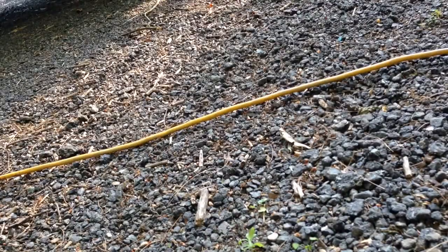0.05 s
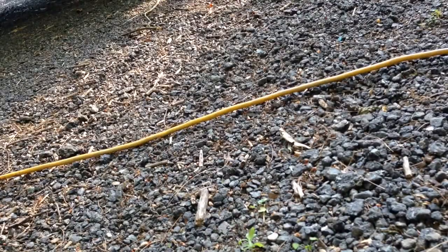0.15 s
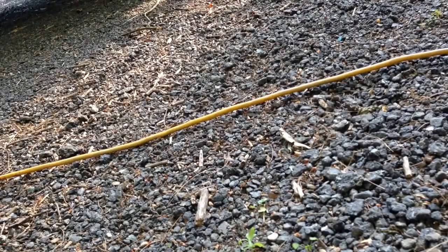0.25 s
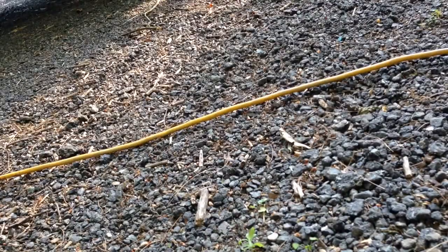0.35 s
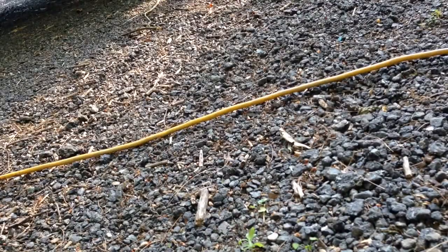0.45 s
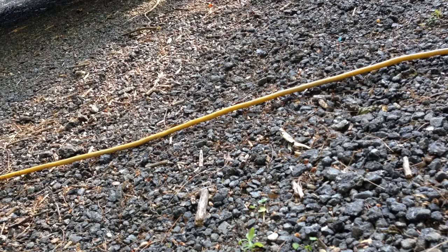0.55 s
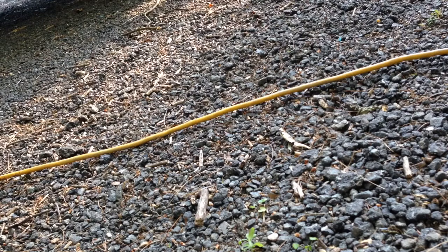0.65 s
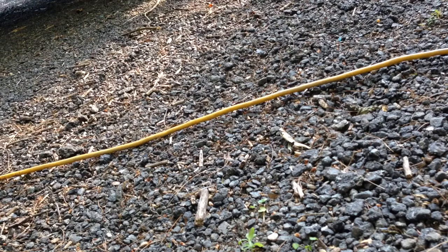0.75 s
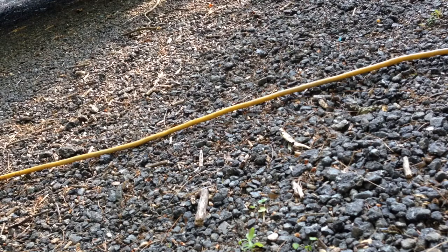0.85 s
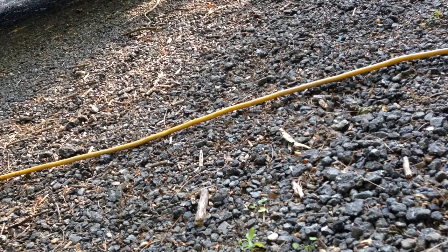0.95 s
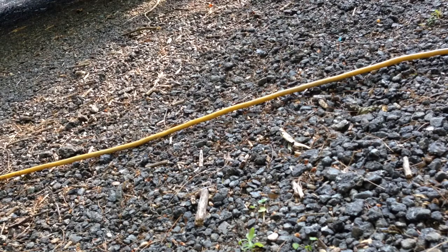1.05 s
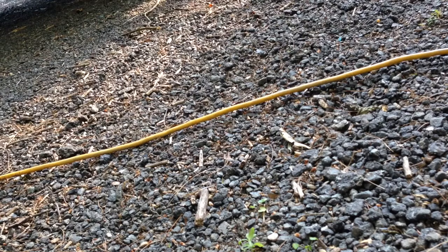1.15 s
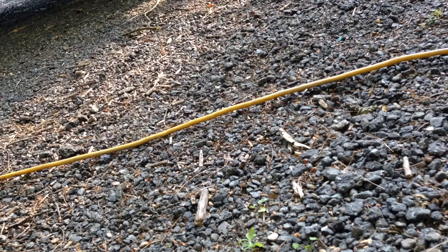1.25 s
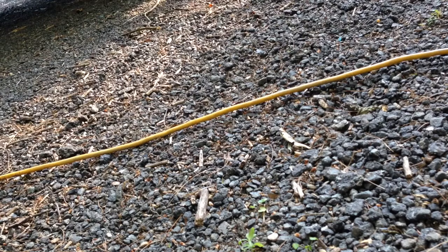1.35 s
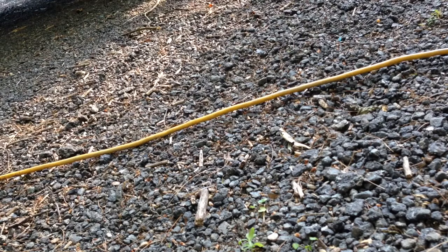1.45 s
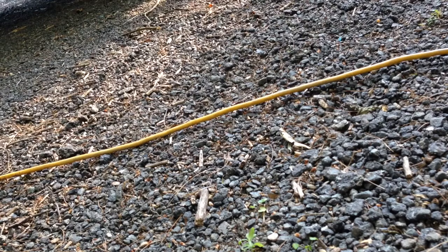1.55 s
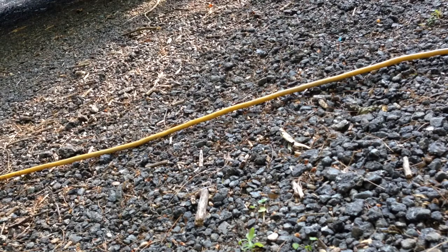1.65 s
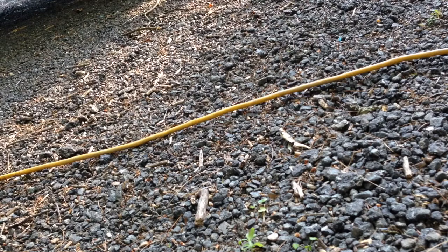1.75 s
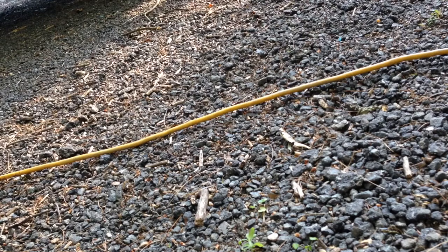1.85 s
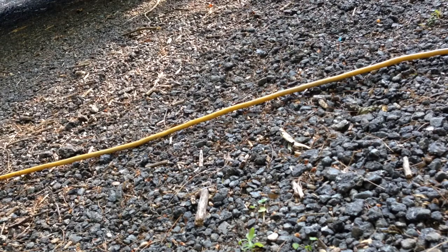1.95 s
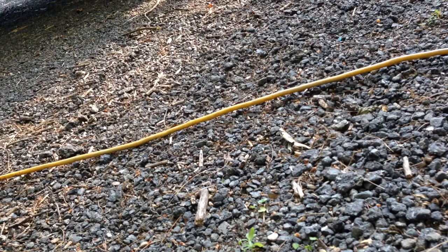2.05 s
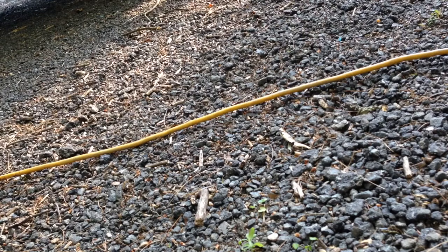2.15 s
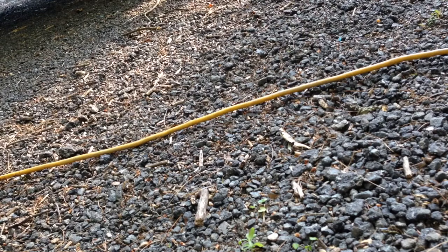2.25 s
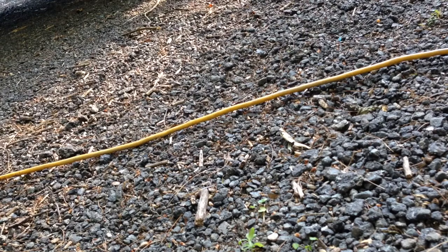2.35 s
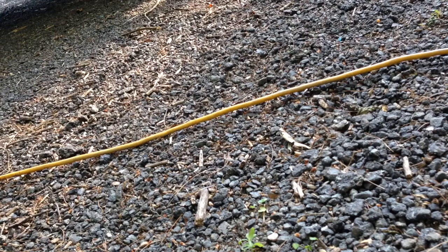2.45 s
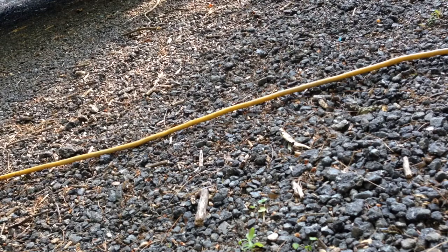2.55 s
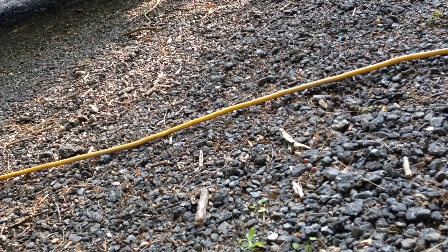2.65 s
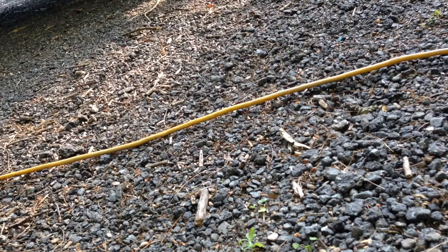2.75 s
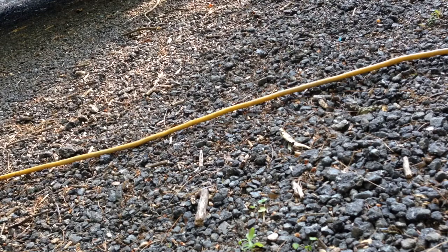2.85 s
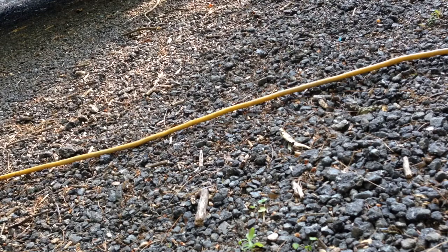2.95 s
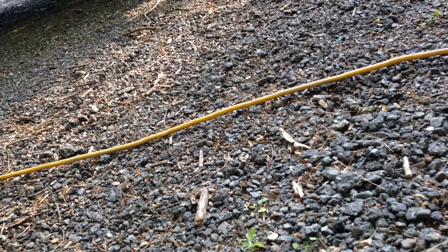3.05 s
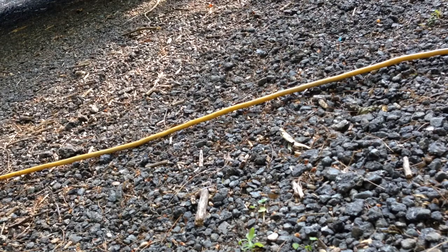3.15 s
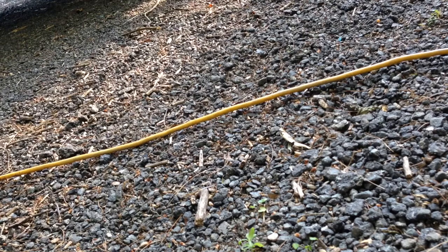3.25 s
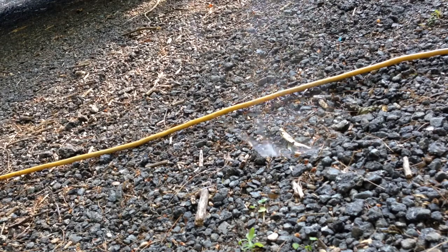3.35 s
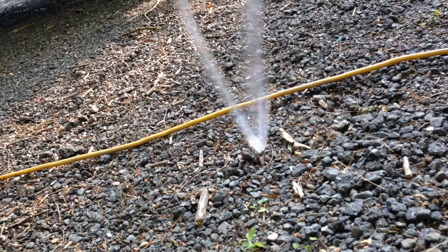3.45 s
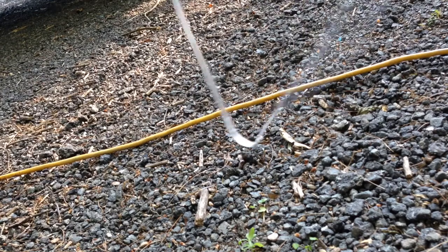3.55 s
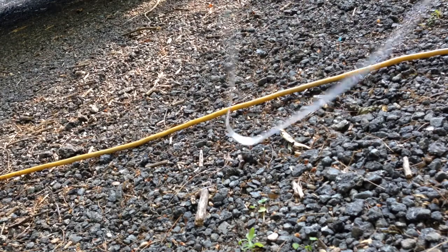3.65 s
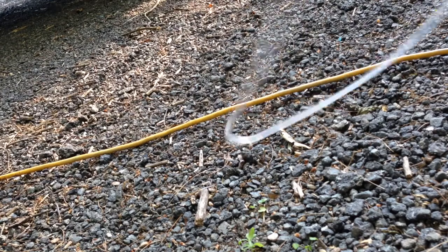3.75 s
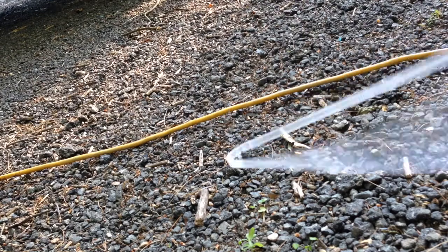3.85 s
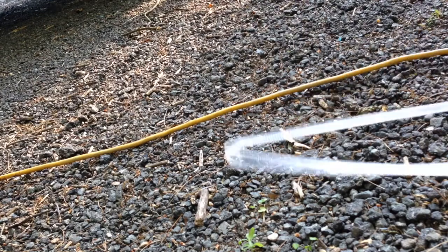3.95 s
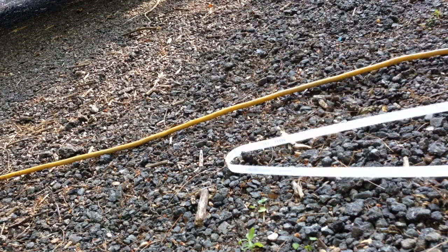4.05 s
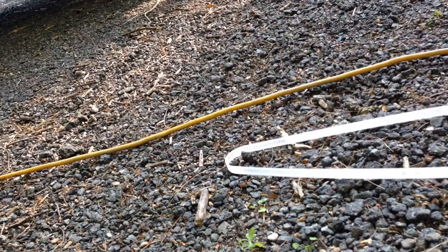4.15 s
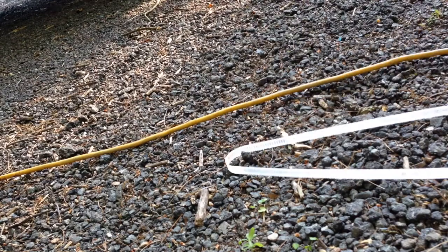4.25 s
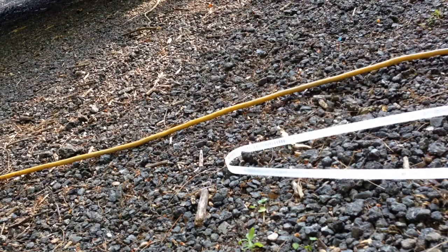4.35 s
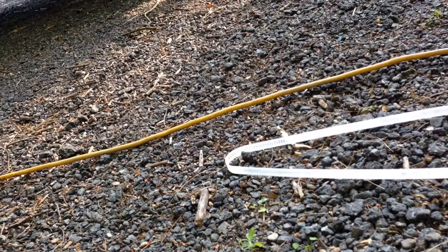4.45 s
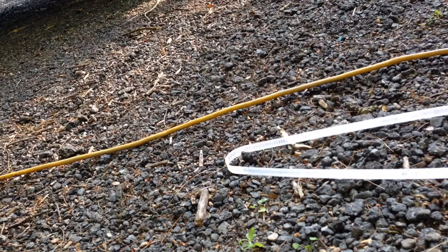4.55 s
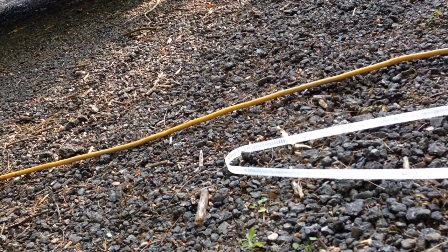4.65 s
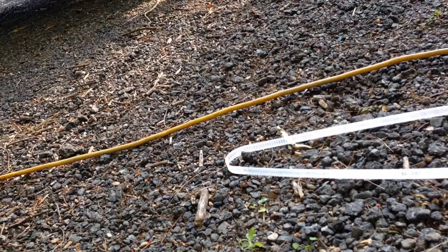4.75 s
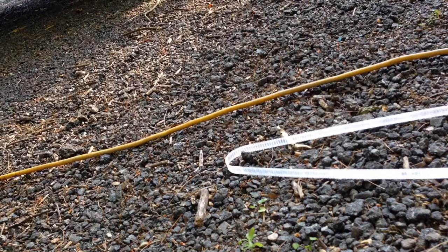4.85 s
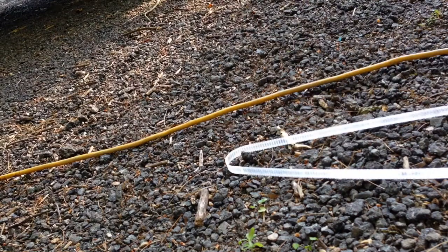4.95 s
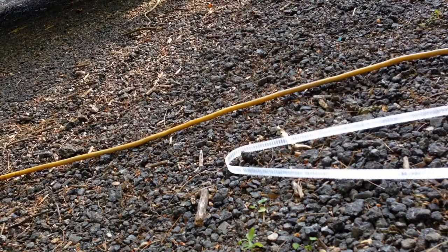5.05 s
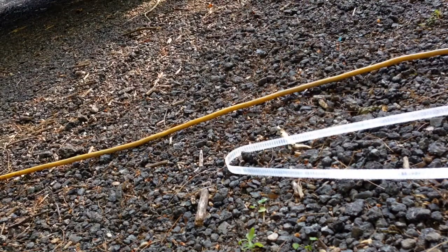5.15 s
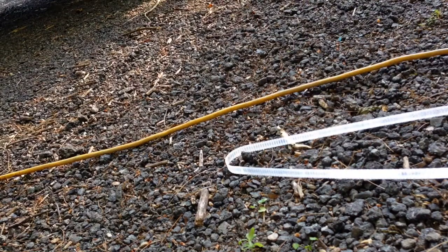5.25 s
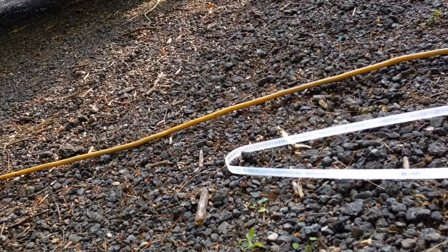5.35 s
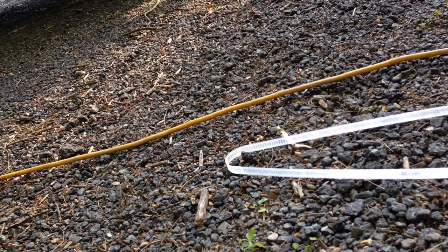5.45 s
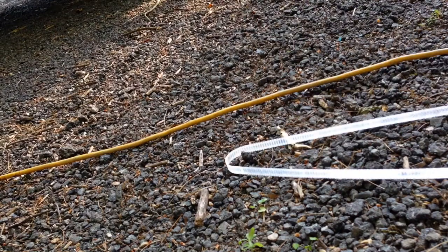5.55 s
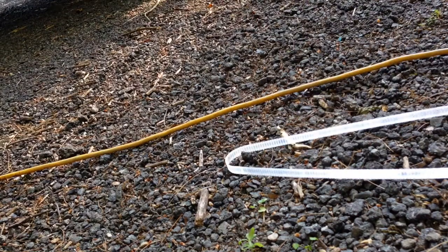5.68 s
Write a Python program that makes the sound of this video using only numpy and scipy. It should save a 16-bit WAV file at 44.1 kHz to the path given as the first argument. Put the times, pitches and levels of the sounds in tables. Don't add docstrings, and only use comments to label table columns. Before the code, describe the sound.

Throughout, an outdoor bed of low distant traffic, a faint wavering engine tone near 190 Hz and soft leafy hiss. Burry two-part bird chirps come at about 0.45, 1.25, 2.1, 2.8, 3.5, 4.3 and 5.3 seconds, with small whistles between, echoing from trees. Nearby, dull tool ticks fall at 0.1 and 0.23, in a light cluster from 0.8 to 1.1, and at 1.4. A small crackling scuff comes at 2.97. At 3.12 the sound drops almost silent for an instant. At 3.44 a dry, bright, bassless plastic snap is the loudest event, followed by a weak flick at 3.56. From 3.9 to 4.1 the strap lands: gravel crackle, short hollow thump, hard slap at 3.99, quick rattling and sliding. A sharp tick at 4.38 and sparse settling follow. From 5.1 to the end at 5.7, loose metal jingles thinly among pebble clicks.

```python
import sys
import numpy as np
from scipy import signal
from scipy.fft import rfft, irfft
from scipy.io import wavfile
from scipy.ndimage import uniform_filter1d

SR = 44100
rng = np.random.default_rng(int(sys.argv[2]) if len(sys.argv) > 2 else 0)


def pcm_store(signal):
    levels = np.round(np.clip(np.atleast_2d(signal), -1, 1) * 32767)
    wavfile.write(sys.argv[1], SR, levels.astype(np.int16).T)


def voltage_ratio(decibels):
    exponent = np.asarray(decibels, float) / 20
    return 10 ** exponent


N = 252075


def band(x, hz, width_hz):
    return signal.lfilter(*signal.iirpeak(min(hz, .45 * SR), max(hz / width_hz, .3), SR), x)


def add(out, s, x, peak_db):
    i = int(s * SR)
    x = x[:N - i]
    out[i:i + len(x)] += x * voltage_ratio(peak_db) / np.abs(x).max()


def coloured(points, rms_db):
    hz, level_db = np.transpose(points)
    log_hz = np.log(np.fft.rfftfreq(N, 1 / SR) + 1)
    shape_db = np.interp(log_hz, np.log(hz), level_db, -90, -90)
    x = irfft(rfft(rng.standard_normal(N)) * voltage_ratio(shape_db), N)
    return x * voltage_ratio(rms_db) / x.std()


def curve(points):
    return np.interp(np.arange(N) / SR, *np.transpose(points))


def walk(rate_hz):
    k = int(SR / rate_hz)
    held = np.repeat(rng.standard_normal(N // k + 1), k)
    return uniform_filter1d(uniform_filter1d(held, k), k)[:N]


def swells(table):
    t = np.arange(N) / SR
    levels_db = [peak_db - 1e4 * np.maximum((s - t) / rise_ms, (t - s) / fade_ms)
                 for s, peak_db, rise_ms, fade_ms in table]
    return np.max(levels_db, axis=0)


def echoes(x, t60_s, wet_db, density):
    t = np.arange(SR) / SR
    hits = rng.standard_normal(SR) * (rng.random(SR) < density)
    tail = hits * voltage_ratio(-60 * t / t60_s) * (t > .004)
    return x + voltage_ratio(wet_db) * signal.fftconvolve(x, tail / np.sqrt(np.sum(tail ** 2)))[:N]


def clicks(table, body_db, bright_db, ms, sharpness, wide_db, body_hz, rise, rough_db=9.5):
    out, t = np.zeros(N), np.arange(2048) / SR
    colours = np.transpose(np.broadcast_arrays(body_db, bright_db, ms))
    noises = rng.standard_normal((len(table), 2048))
    for (s, peak_db, ring_hz, *_), (body, bright, contact_ms), noise in zip(table, colours, noises):
        rough = noise * voltage_ratio(rough_db * np.roll(noise, 512))
        contact = rough * t ** rise * np.exp(-t * 1000 / max(contact_ms, .05))
        parts = [(ring_hz, ring_hz / sharpness, 0), (body_hz, body_hz * 0.53, body),
                 (6300, 4800, wide_db), (12000, 6500, bright)]
        click = 0
        for hz, width_hz, db in parts:
            ring = band(band(contact, hz, width_hz), hz, 2.0 * width_hz)
            click = click + voltage_ratio(db) * ring / np.abs(ring).max()
        add(out, s, click, peak_db)
    return out


def rumble():
    # f/Hz, density/dB
    spectrum = [(12, -55), (20, -24.5), (80, 2), (128, -1), (282, -16.5), (540, -27.5), (910, -37.5),
                (1540, -120)]
    # t/s, level/dB
    drift = [(0, -0.5), (2.0, 0), (4.0, -1), (4.95, -3), (5.72, -2.5)]
    return coloured(spectrum, rms_db=-47.5) * voltage_ratio(curve(drift))


def drone():
    # peak t/s, peak/dB, swell/(ms per 10 dB), fade/(ms per 10 dB)
    revs = [(.06, -44.5, 180, 150), (.4, -48, 40, 162), (.65, -54, 120, 80), (.91, -48, 92, 90),
            (1.48, -53.5, 1100, 3000), (2.04, -52.5, 280, 400), (2.42, -52, 600, 110),
            (2.66, -56, 760, 230), (3.3, -55, 3000, 1995), (4.92, -47, 450, 46), (5.21, -56, 280, 300),
            (5.72, -52, 230, 100)]
    tone = np.sin(2 * np.pi * np.cumsum(187.7 * (1 + .06 * walk(25))) / SR)
    return tone * voltage_ratio(swells(revs) - 4.5 + 6.2 * walk(20))


def air_hiss():
    # f/Hz, density/dB
    spectrum = [(290, -63), (500, -2), (850, -4.5), (1180, -5), (2530, -5), (4180, -7.5), (15400, -22)]
    # t/s, level/dB
    drift = [(0, 2), (2.4, 1.44), (3.3, 0.5), (4.9, -1), (5.3, 1.5), (5.72, -1.5)]
    # t/s, level/dB
    leaves = [(0, 0.5), (1.8, 2), (2.2, 1.5), (2.95, 3), (3.3, 1), (4.2, 4), (4.75, 3.5), (5.0, 0.5),
              (5.72, -7)]
    air = coloured(spectrum, rms_db=-62.5) * voltage_ratio(curve(drift) + .5 * walk(9))
    treble = signal.sosfiltfilt(signal.butter(2, 5500, "high", fs=SR, output="sos"), air)
    return air + (voltage_ratio(curve(leaves)) - 1) * treble


def chirps(burr, flutter):
    # t/s, peak/dB, pitch factor, end of first fall f/Hz, second part level/dB
    calls = [(0.449, -40, 1.005, 2900, -8.5), (1.2477, -43.5, 1, 3950, -3),
             (2.0835, -43, 1.013, 3800, -5.5), (2.7689, -41.5, 1.04, 3800, -4.5),
             (3.5318, -46.5, 1.015, 3700, -4), (4.3112, -48.5, 1.16, 4400, -14),
             (5.3164, -42, 0.99, 3600, -4.5)]
    # t/s from start, f/Hz, level/dB
    contour = [
        (0, 4150, 3),
        (.006, 4650, -4),
        (.038, 4850, 2),
        (.052, 3500, -8),
        (.07, 3100, 0.5),
        (.1, 3800, 1.5),
        (.118, 3100, -0.5),
        (.14, 3700, -3.5),
        (.16, 3200, -16),
    ]
    out, (at, hz, db) = np.zeros(N), np.transpose(contour)
    t = np.arange(int(at[-1] * SR)) / SR
    second = t > .06
    warble = .034 * np.sin(2 * np.pi * 230 * t)
    for s, peak_db, pitch, fall_hz, second_db in calls:
        hz[3] = fall_hz
        wobble = 1 + np.where(second, .08, .025) * burr[int(s * SR):][:len(t)] + warble
        tone = np.sin(2 * np.pi * np.cumsum(pitch * np.interp(t, at, hz) * wobble) / SR)
        add(out, s, tone * voltage_ratio(np.interp(t, at, db) + second_db * second), peak_db - 6.0)
    return out * flutter


def whistles(table, droop, burr, flutter):
    out = np.zeros(N)
    for s, peak_db, note_hz, length_s in table:
        t = np.arange(int(max(length_s, .005) * SR)) / SR
        u = t / t[-1]
        hz = note_hz * (1 + 0.027 * burr[int(s * SR):][:len(t)] - droop * (u - .5))
        tone = np.sin(2 * np.pi * np.cumsum(hz) / SR)
        add(out, s, tone * np.abs(np.sin(np.pi * u)) ** 0.61, peak_db - 7.5)
    return out * flutter


def birds():
    # t/s, peak/dB, f/Hz, length/s
    low_notes = [(0.3027, -43.5, 2823, 0.013), (0.3544, -51.5, 2580, 0.045), (0.414, -54, 3086, 0.059),
                 (0.828, -54, 2500, 0.027), (.865, -51.5, 2706, .025), (.915, -55, 2880, 0.0072),
                 (0.924, -48, 2405, 0.021), (1.0416, -48.5, 2396, 0.029), (1.0994, -57, 2260, 0.039),
                 (1.1594, -54, 2400, 0.031), (1.2235, -47.5, 2890, 0.014), (1.485, -50, 2940, 0.021),
                 (1.548, -54, 2550, 0.021), (1.944, -55.5, 3110, 0.055), (1.9994, -59, 2250, 0.03),
                 (2.5094, -55.5, 2513, 0.037), (4.1394, -49, 3110, 0.03), (4.1994, -56, 3340, 0.053),
                 (4.215, -55.5, 2100, 0.022), (1.19, -54, 2500, .03), (.975, -58, 2500, 0.018),
                 (4.6394, -51, 3150, 0.038), (4.6982, -48.5, 2640, 0.018), (4.682, -57, 3130, 0.024),
                 (4.78, -50, 2740, .014), (4.801, -48, 2276, 0.048), (5.4924, -52.5, 2610, 0.022)]
    # t/s, peak/dB, f/Hz, length/s
    seeps = [(0.422, -55, 5850, 0.032), (0.8854, -57, 8000, 0.018), (1.2294, -59, 6300, 0.014),
             (1.522, -59, 5400, 0.02), (1.6397, -48, 8450, 0.014), (2.745, -59, 6070, 0.02),
             (.46, -62.5, 9300, .04), (4.684, -60, 8100, 0.012), (2.03, -56, 6000, .04)]
    burr, flutter = walk(420), voltage_ratio(3 * walk(120))
    calls = echoes(chirps(burr, flutter), t60_s=.6, wet_db=0.5, density=.04)
    low = echoes(whistles(low_notes, 0.035, burr, flutter), t60_s=0.43, wet_db=0.5, density=0.05)
    high = echoes(whistles(seeps, -0.128, burr, flutter), t60_s=0.11, wet_db=-3.0, density=0.019)
    return calls + low * voltage_ratio(3.5 * walk(60)) + high


def jingles():
    # t/s, peak/dB, level of modes below 5500 Hz/dB
    knocks = [(5.125, -51.5, 6), (5.1682, -50, 12), (5.2001, -40, -9), (5.2618, -45.5, 4),
              (5.2852, -39, -5), (5.3553, -41.5, -2.5), (5.385, -47.5, -11), (5.4567, -46, -5),
              (5.4902, -47, 0), (5.5176, -44, 3), (5.5493, -47, -2), (5.5895, -47, 3), (5.6268, -42, -9),
              (5.656, -51.5, 25)]
    # f/Hz, level/dB, t60/s
    modes = [(1820, -16.5, 0.25), (2160, -18, .2), (2590, -10, 0.093), (3500, -9, 0.066), (5070, -6, 0.045),
             (6140, -1.5, 0.078), (6350, -4, 0.05), (6700, -9, .04), (10250, -4.5, 0.04)]
    out, t = np.zeros(N), np.arange(SR // 3) / SR
    chatter = np.tile(voltage_ratio(4.8 * walk(110)), 2)
    shares = rng.standard_normal((len(knocks), len(modes)))
    for (s, peak_db, low_db), share in zip(knocks, shares):
        ring = 0
        for (hz, db, t60_s), c in zip(modes, share):
            level_db = db + 3.0 * c + low_db * (hz < 5500) - 60 * t / t60_s
            ring = ring + voltage_ratio(level_db) * np.sin(2 * np.pi * hz * (1 + 0.0049 * c) * t)
        add(out, s, ring * (1 - np.exp(-t / 0.00045)) * chatter[int(s * SR):][:len(t)], peak_db)
    return out


def tool():
    # t/s, peak/dB, ring f/Hz, body/dB
    ticks = [(0.0996, -33, 2270, -6), (.2025, -53, 2100, -8), (.2155, -46, 1700, -4),
             (0.2217, -49, 2500, -8), (0.226, -31.5, 2130, 3), (.998, -49, 2200, 2),
             (0.7756, -47.5, 1860, 7), (0.8475, -43, 2370, 10), (0.9394, -46, 2450, 10),
             (0.976, -44, 2590, 6), (.951, -49, 1400, -2), (1.012, -51, 1360, -4), (1.047, -52, 1300, -2),
             (.866, -48, 1900, 8), (.815, -48, 1900, 11), (1.0323, -41.5, 2360, 0), (1.0694, -48, 2330, -4),
             (1.0976, -51.5, 1300, -8), (1.2022, -41, 2800, 4), (1.3803, -37, 2240, 8),
             (2.1994, -51, 3500, -9), (2.2102, -44, 3370, -12), (3.818, -54, 1900, -5.5),
             (3.8423, -50.5, 2100, -8), (4.59, -45.5, 2430, -2), (5.099, -41.5, 3370, -14)]
    _, _, _, body_db = np.transpose(ticks)
    x = clicks(ticks, body_db, bright_db=-30, ms=0.226, sharpness=5.6, wide_db=-21,
               body_hz=1630, rise=0.64, rough_db=0)
    x = x + echoes(jingles(), t60_s=.2, wet_db=-4., density=.03)
    bounce_ms, bounce_db = 1.632, -8.5
    return x + voltage_ratio(bounce_db) * np.roll(x, int(bounce_ms * SR / 1000))


def pebbles():
    # t/s, peak/dB, ring f/Hz, body/dB
    knocks = [(5.134, -47.5, 2700, -7), (5.172, -54, 2610, -11), (5.337, -40, 4900, -17),
              (5.381, -44.5, 6100, -15), (5.399, -47, 3180, -13), (5.477, -43, 6250, -22),
              (5.522, -49, 6140, -13), (5.5443, -42, 5150, -13), (5.5694, -48, 6350, -4),
              (5.628, -42.5, 3980, -15), (5.6303, -35, 6240, -30), (5.629, -36, 6700, -19)]
    _, _, _, body_db = np.transpose(knocks)
    return clicks(knocks, body_db, bright_db=-24, ms=1.3, sharpness=9.2, wide_db=-4,
                  body_hz=2500, rise=0.25, rough_db=7)


def scuffs():
    # t/s, peak/dB, ring f/Hz, brightness/dB
    rubs = [(0.8594, -51, 4130, -11), (0.9174, -41.5, 8100, -6), (1.522, -45, 5570, -20),
            (1.7035, -52, 6130, -17.5), (2.238, -43, 4620, -20), (2.9735, -35, 6500, -25),
            (2.988, -53, 4930, -18), (3.1378, -42.5, 4030, -12), (3.1384, -46, 4860, -8),
            (3.4544, -57, 4650, -8), (3.4984, -52, 5200, -13), (4.384, -45, 5200, -8),
            (4.427, -58, 4660, -22), (4.49, -47, 6100, -13.5), (4.5094, -60, 6200, -18),
            (4.6887, -55, 4070, -12), (5.2003, -60, 6060, -22), (5.2849, -43, 5860, -18),
            (5.381, -47, 6100, -17)]
    _, _, _, bright_db = np.transpose(rubs)
    return clicks(rubs, -1.5, bright_db, ms=5.5, sharpness=2.9, wide_db=-6.0, body_hz=3000, rise=1.0)


def rustle():
    # peak t/s, peak/dB, swell/(ms per 10 dB), fade/(ms per 10 dB)
    slides = [(.925, -53.5, 25, 17), (2.975, -43, 3.8, 12.5), (3.01, -57.5, 11, 60),
              (3.454, -54.5, 2.3, 60), (3.913, -43.5, 4.3, 22), (3.928, -38.5, 15.5, 16),
              (3.972, -40, 5.2, 13), (4.0, -45, 15, 20), (4.04, -47, 73, 43), (4.07, -46.5, 15, 32),
              (4.12, -60.5, 20, 300), (4.383, -49, 54, 34), (4.33, -57, 150, 60), (4.496, -55, 420, 54),
              (5.206, -54, 41, 11), (5.284, -51, 19, 8), (5.39, -56.5, 81, 47), (5.52, -57, 360, 250),
              (5.626, -56, 3.9, 39)]
    # f/Hz, width/Hz, level/dB
    resonances = [(1020, 580, 5.5), (2450, 1000, 6), (4070, 2300, 8.5), (6500, 1200, -5)]
    grains = rng.standard_normal(N) * voltage_ratio(2.4 * rng.exponential(size=N) + 3.5 * walk(250))
    body = sum(voltage_ratio(db) * band(grains, hz, width_hz) for hz, width_hz, db in resonances)
    treble = band(band(grains, 8700, 6100), 7300, 8200)
    mix = voltage_ratio(0.5) * body / body.std() + voltage_ratio(-15) * treble / treble.std()
    return mix * voltage_ratio(swells(slides))


def thuds():
    # t/s, peak/dB, f/Hz, decay/cycles
    blows = [(3.9357, -32.5, 249, 2.07), (3.934, -30.5, 550, 1.27), (3.909, -53, 950, 6.4),
             (3.926, -42, 1065, 13), (3.937, -38, 904, 5.7), (3.995, -29.5, 1230, 1.46),
             (4.03, -52, 1020, 26), (4.06, -50.5, 1020, 18), (4.225, -54.5, 1045, 19),
             (4.375, -59, 976, 18), (4.435, -60, 1020, 18), (4.529, -65, 963, 17)]
    out, t = np.zeros(N), np.arange(4000) / SR
    for s, peak_db, hz, cycles in blows:
        attack = 1 - np.exp(-t * hz / (0.06 * cycles))
        add(out, s, -np.sin(2 * np.pi * hz * t) * np.exp(-t * hz / cycles) * attack, peak_db)
    return signal.lfilter(*signal.butter(2, 200, "high", fs=SR), out)


def cracks():
    # t/s, peak/dB, ring f/Hz, body/dB
    hits = [(2.951, -41.5, 5080, -3), (2.9723, -35, 2100, 4), (2.976, -34, 6000, -12),
            (2.98, -42, 3000, -6), (3.0107, -41, 3650, -14), (3.033, -37.5, 5200, -1),
            (3.1725, -46, 2300, -24), (3.401, -44.5, 3960, -9), (3.4664, -45, 4850, -17),
            (3.485, -45, 3430, -15.5), (3.6334, -43.5, 3370, -8), (3.7435, -46, 3900, -17),
            (3.864, -40, 7500, -24.5), (3.9026, -40, 6400, -19), (3.9084, -37, 6740, -16),
            (3.913, -28, 6100, -12), (3.92, -26, 6840, -5), (3.926, -28, 4960, 0), (3.94, -33, 6160, -10),
            (3.974, -42, 5500, -12), (3.979, -43, 4300, -4), (3.986, -36, 2600, 0), (4.015, -25, 3820, 7),
            (4.017, -32, 1990, 1), (4.0216, -38, 2780, 2), (4.027, -39, 2500, -19),
            (4.0451, -30, 6030, -19), (4.0652, -32, 6200, -19), (4.0677, -32, 4330, -5),
            (4.0698, -35.5, 2460, 5), (4.079, -34, 4380, -23), (4.0884, -41, 2510, -26),
            (4.324, -41, 4900, -14), (4.3485, -38.5, 3520, -10), (4.374, -40, 10000, -25),
            (4.42, -46, 5500, -14), (4.431, -45, 9500, -22), (4.462, -47, 7000, -14),
            (4.493, -41, 6000, -14), (4.514, -44, 5600, -10), (4.608, -49, 4500, -6),
            (5.627, -47, 10500, -28), (4.381, -26.5, 5670, -23)]
    _, _, _, body_db = np.transpose(hits)
    return clicks(hits, body_db, bright_db=-20, ms=.85, sharpness=3.7, wide_db=4,
                  body_hz=2500, rise=0.19, rough_db=6)


def snap():
    # t/s, peak/dB, ring f/Hz, brightness/dB, contact/ms
    release = [
        (3.4429, -16, 4700, -26, .3),
        (3.4435, -11.5, 6600, -24, .1),
        (3.4447, -21, 5300, -24, .55),
        (3.4462, -32, 4200, -24, .8),
    ]
    # t/s, peak/dB, ring f/Hz, brightness/dB, contact/ms
    whips = [
        (3.5577, -29, 8160, 0, 1.5),
        (3.9684, -25.5, 4600, -16, 1.1),
        (3.9906, -18, 5100, -8, 0.67),
        (3.9947, -16.5, 4370, -29, 0.5),
        (3.9948, -20, 2450, -29, 1.4),
        (4.0006, -23.5, 4600, -16, .6),
        (4.0374, -22, 6050, -2, 0.26),
    ]
    jerks = release + whips
    _, _, _, bright_db, ms = np.transpose(jerks)
    x = clicks(jerks, -10, bright_db, ms, sharpness=3.8, wide_db=-6, body_hz=2650, rise=0.22, rough_db=4)
    return signal.sosfilt(signal.butter(1, 900, "high", fs=SR, output="sos"), x)


def scene():
    background = rumble() + drone() + air_hiss() + birds()
    strap = rustle() + thuds() + cracks() + snap()
    near = echoes(tool() + pebbles() + scuffs() + strap, t60_s=.2, wet_db=-23, density=.1)
    return (background + near)[None]


def band_limit(x):
    return signal.sosfilt(signal.butter(12, 16200, fs=SR, output="sos"), x)


def record(dry):
    # t/s, gain/dB
    gap = [
        (3.113, 2.5),
        (3.114, -9),
        (3.123, -10),
        (3.125, -46),
        (3.132, -50),
        (3.138, -45),
        (3.138, 3.5),
    ]
    top_hz = 15450
    dull = signal.sosfilt(signal.ellip(6, .2, 24, top_hz, fs=SR, output="sos"), dry)
    return band_limit(dull * voltage_ratio(curve(gap)))


dry = scene()
out = record(dry)
pcm_store(out)
```